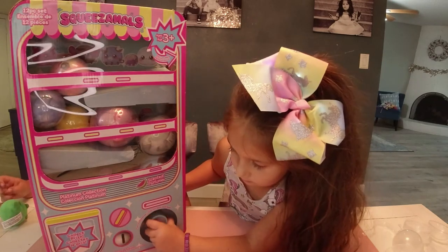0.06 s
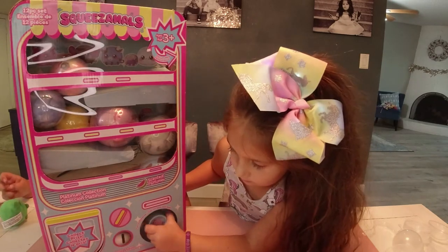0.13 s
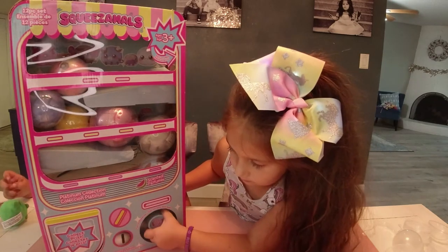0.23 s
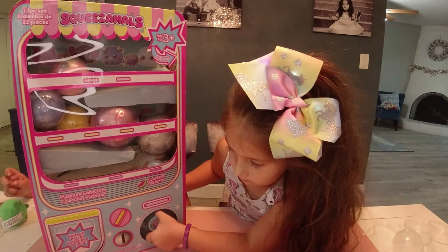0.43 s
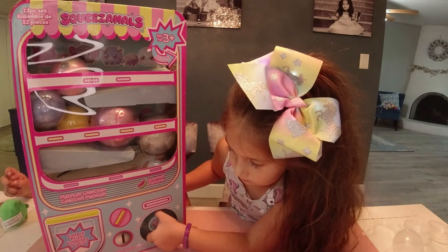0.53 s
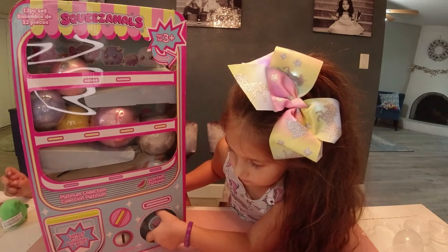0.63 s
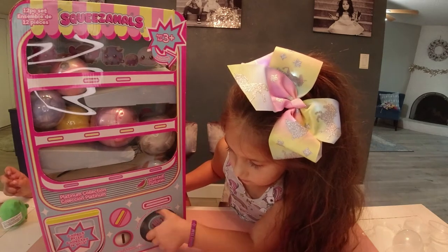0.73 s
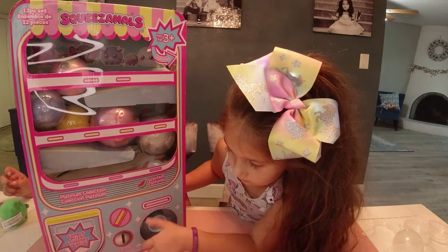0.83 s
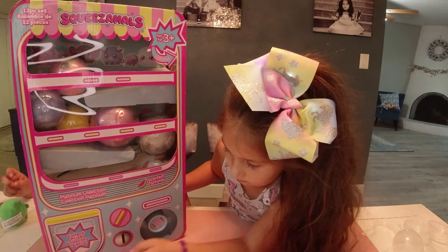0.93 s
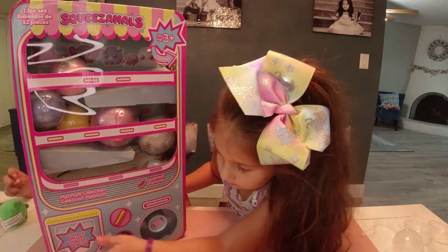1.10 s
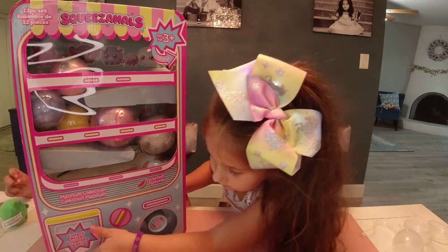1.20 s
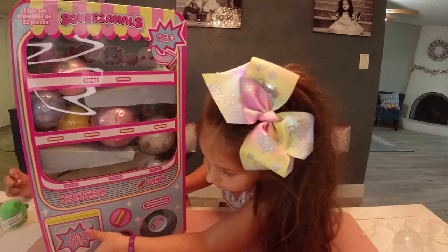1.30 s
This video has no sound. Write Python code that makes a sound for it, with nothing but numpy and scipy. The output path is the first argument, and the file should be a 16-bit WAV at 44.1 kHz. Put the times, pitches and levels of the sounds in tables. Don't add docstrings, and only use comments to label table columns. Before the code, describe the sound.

Plastic capsules clatter in a hollow toy dispenser, heard close in a quiet, softly humming room. Low hand rumble and faint rubbing come first; at 0.25 s the mechanism lets go with a sharp clack. Hard knocks, dull thuds and rolling crowd together until about 0.5 s, weakening by 0.6. Lighter taps follow at 0.8 to 0.98 s, then near quiet and one small knock at 1.23 s with a faint last touch.

```python
import sys
import numpy as np
from scipy import signal
from scipy.fft import rfft, irfft, next_fast_len
from scipy.io import wavfile

SR = 44100
rng = np.random.default_rng(int(sys.argv[2]) if len(sys.argv) > 2 else 0)


def attenuation_scalar(level_db):
    decades = np.asarray(level_db, float) / 20
    return 10 ** decades


def digitize_waveform(pressure):
    field = np.atleast_2d(pressure).T
    bounded = np.clip(field, -1, 1)
    quanta = np.round(bounded * 32767).astype(np.int16)
    wavfile.write(sys.argv[1], SR, quanta)


N = 59535
OPPOSITE = np.array([[1], [-1]])

# start_s, level_db
HANDLING = [
    (0, -65),
    (0.171, -58),
    (.7, -62),
    (.95, -61.5),
    (1.099, -83.5),
    (1.22, -67.5),
    (1.3, -66),
]
HANDLING_HZ, HANDLING_SIDE_DB = (28, 108), -19
# frequency_hz, density_db (per Hz)
FLOOR_SPECTRUM = [(15, -21), (34, -1), (80, -18), (200, -19), (560, -30), (1500, -38), (4500, -44.5),
                  (9000, -59.5)]
FLOOR_DB, FLOOR_SIDE_DB = -69, -7

# start_s, level_db, brightness_db
ROLL_EFFORT = [(0, -73.5, -0.5), (.07, -66.5, -5.5), (.126, -65, 4.5), (.18, -58, 6), (0.223, -53, 5),
               (.29, -64, 8), (0.331, -41.5, -4.5), (.41, -39.5, -4), (.47, -43, -9.5), (.57, -55, -4.5),
               (0.649, -58.5, -12.5), (0.773, -72.5, -14), (.80, -57.5, -4.5), (.86, -58.5, -2.5),
               (.878, -63.5, -4), (.92, -63.5, -6), (1.05, -92.5, 0.5), (1.35, -73, -5.5)]
# frequency_hz, density_db (per Hz)
RUB_SPECTRUM = [(60, -1.5), (180, -4), (450, -7), (1000, -8.5), (1900, -17), (3100, -19.5), (4800, -32.5),
                (7000, -44)]
# pitch_hz, level_db, t60_s
CABINET_MODES = [(134.5, -4.5, 0.096), (213, -10, 0.18), (322.2, 0, 0.15), (400, -5.5, 0.12),
                 (460, -5.5, 0.056), (510.8, -3, .14), (590, -8, 0.2), (749.4, 1, 0.046),
                 (946, -4.5, 0.073), (1046.4, -7, 0.12), (1190, -10.5, 0.011), (1329, -2, 0.033),
                 (1780, 2, 0.014), (2280, -11, 0.02)]
MODE_SPREAD_DB = 4.5
GRAINS_PER_S, GRAIN_SPREAD_DB, ROLL_DB, ROLL_BODY_DB = 1000, 1.5, 5, -7

# start_s, peak_db, pitch_hz, ring_share_db
TICKS = [(0.148, -55, 3250, 4), (.155, -58, 3270, 9.5), (.241, -40.5, 2500, -9), (0.2487, -34, 3155, -3),
         (.250, -48, 4700, 2.5), (0.3053, -33.5, 2720, -11), (0.339, -36.5, 2706, 2.5),
         (.361, -67, 3540, -7.5), (.385, -43.5, 4740, -1.5), (0.407, -39, 1826, 4.5),
         (.434, -28, 2958, -11), (0.489, -50.5, 2410, -0.5), (0.554, -43, 3010, -10.5),
         (0.79, -49.5, 1830, -6), (.810, -66.5, 3020, 1.5), (0.844, -61.5, 2950, -4), (0.863, -63, 2860, 3),
         (0.808, -59, 1900, 4.5), (.822, -75.5, 4270, 0), (0.856, -56.5, 1900, -2.5),
         (.890, -52.5, 2900, -10), (.896, -60, 4700, -3.5), (.904, -66, 4000, 5.5), (.904, -65, 4710, 1),
         (.904, -49.5, 2950, -3), (.975, -60.5, 2280, -9.5), (1.2311, -51, 1800, -4),
         (1.2315, -57, 2600, -1), (1.2315, -64, 3160, 7), (1.231, -69.5, 4700, 5.5), (1.296, -67, 2100, 3)]
TICK_T60_S, TICK_CHATTER_S = 0.013, 0.0012
# frequency_hz, density_db (per Hz)
CRACK_SPECTRUM = [(500, -3), (2000, 0.5), (3200, -11), (4800, -17), (5400, -31), (7000, -42), (9000, -53)]
# level_db, t60_s
CRACK_FADES = [
    (-16.5, .012),
    (-7.5, 0.11),
]
SCATTER_DB, SCATTER_HZ = -2.5, 2500

# start_s, peak_db, pitch_hz, ring_t60_s, boom_db
THUDS = [(.186, -38, 184, 0.045, -48.5), (0.253, -20, 118, 0.063, -33), (0.274, -24, 187, 0.033, -46),
         (0.309, -22, 212.6, 0.15, -36), (0.334, -45.5, 200, 0.082, -40), (.370, -24, 235, 0.049, -40),
         (.395, -25, 304.5, 0.071, -57), (0.4191, -14, 136.8, 0.08, -32), (0.444, -24, 139.5, 0.22, -45.5),
         (0.471, -27, 124.3, 0.1, -50), (.524, -38.5, 145, 0.39, -48), (.561, -36, 144.5, 0.26, -39.5),
         (0.593, -37.5, 134, 0.11, -52.5), (0.617, -39.5, 140, 0.064, -58.5),
         (0.805, -37, 148, 0.069, -62.5), (.857, -42, 125, 0.084, -58.5), (.900, -44, 136.8, 0.15, -54),
         (1.233, -39.5, 207, 0.14, -73.5), (1.262, -49.5, 158, 0.12, -74.5),
         (1.290, -59.5, 173, 0.11, -90.5)]
BOOM_HZ, BOOM_T60_S = 64, 0.23

# start_s, level_db, top_share_db
BUZZES = [
    (0.233, -77, -22.5),
    (0.2505, -64, 3),
    (0.305, -60.5, -5),
    (.339, -78.5, 2.5),
    (.386, -65, -22),
    (0.436, -64, -25),
    (0.486, -101, -15.5),
]
# frequency_hz, density_db (per Hz)
BUZZ_SPECTRUM = [(4500, -31.5), (6000, -5.5), (7400, -12.5), (8600, 0), (10000, -5), (11500, -14),
                 (13400, -18), (14800, -43)]
BUZZ_SNAP_DB, BUZZ_SNAP_T60_S, BUZZ_T60_S = 3.5, 0.02, 0.21
BUZZ_SIDE_DB, BUZZ_TOP_SIDE_DB = 0.5, 5
BUZZ_LOW_STOP_HZ, BUZZ_HIGH_STOP_HZ, BUZZ_RISE = 11300, 8600, 0.01

# start_s, peak_db, shell_pitch_hz, upper_shell_pitch_hz, cabinet_share_db
KNOCKS = [(.241, -32.5, 440, 953, -12.5), (0.2487, -10.5, 1190, 1673, -7), (.257, -26, 442, 1060, -37.5),
          (0.277, -38.5, 308, 920, 5), (0.3057, -11.5, 727, 400, -5), (.316, -22.5, 550, 900, -19),
          (.338, -21.5, 937, 1410, 0), (.361, -27, 460, 940, -5), (.386, -15.5, 400, 747, -11),
          (0.4344, -11.5, 740, 1358, -16.5), (0.45, -25, 550, 1217, -11), (0.4892, -23, 641, 329, -16.5),
          (.554, -33, 400, 1210, -3), (.562, -32.5, 717, 1210, 2.5), (0.752, -51.5, 1250, 1720, -15),
          (0.782, -57, 400, 700, 8), (.791, -31, 690, 1332, -7), (.809, -37, 590, 1010, -23.5),
          (0.885, -41, 400, 1080, -5), (.900, -29, 616, 1316, -9.5), (0.9749, -40, 568, 1328, -12.5),
          (1.2315, -36.5, 564, 787, -1), (1.2358, -41.5, 590, 1120, -17), (1.293, -54.5, 560, 1120, -2)]
SHELL_T60_S, UPPER_DB, UPPER_T60_S = 0.014, -3.5, 0.022
CONTACT_S, CHATTER_S, SHELL_LOW_HZ = 0.00044, 0.0029, 110

# start_s, peak_db, pitch_hz, t60_s
RINGS = [(.251, -21.5, 400, 0.04), (0.2539, -29, 1220, 0.034), (.256, -20, 920, 0.029),
         (.263, -36, 324, 0.044), (0.272, -27, 1190, 0.063), (0.271, -35.5, 1570, 0.045),
         (.314, -25, 315, .04), (.322, -32, 755, 0.066), (.333, -20, 528, 0.082), (.339, -28, 1330, .03),
         (.344, -25, 929, 0.092), (.361, -28, 968, 0.061), (.376, -22.5, 464, .04),
         (.3865, -12.5, 400, 0.032), (.399, -19, 329, 0.043), (.404, -36, 550, 0.068),
         (.441, -24.5, 349, .06), (.438, -22, 775, 0.034), (0.451, -42.5, 1175, 0.035),
         (.461, -27, 590, .05), (.500, -31.5, 760, 0.057), (.562, -34.5, 760, 0.032),
         (.570, -32, 312, 0.064), (.572, -34.5, 590, 0.086), (.608, -43, 328, 0.091),
         (0.796, -41, 1330, .04), (.818, -39, 616, .05), (.822, -65.5, 4270, 0.1),
         (.858, -49.5, 1850, 0.041), (.908, -44, 590, 0.095), (0.909, -47.5, 1300, 0.036),
         (.926, -43, 590, .06), (0.931, -54, 336, 0.2), (.977, -52, 603, 0.074), (0.983, -50, 1337, 0.035),
         (0.991, -52.5, 305, 0.22), (1.025, -57, 567, 0.18), (1.232, -39.5, 575, 0.051),
         (1.231, -42.5, 1072, .11), (1.232, -49.5, 1097, .15), (1.233, -42.5, 1806, .04),
         (1.246, -41.5, 590, .06), (1.259, -39.5, 557, 0.11), (1.302, -50.5, 577, 0.092)]
RING_DB, RING_DAMPING, RING_CHATTER_S = -7.5, 0.61, 0.0011

ROOM_T60_S, WALL_CUT_HZ, ROOM_DB, ROOM_SIDE_DB = 0.3, 2230, -18, -5
PORT_LAG_S, PORT_ECHO_S, PORT_ECHO_DB, PORT_ECHO_HZ = 0.00003, 0.0011, -3.5, 5050
SWAY_DB, SWAY_HZ = -16.5, 65
MIC_LOW_HZ, MIC_TOP_HZ = 50, 5340


def rms_one(x):
    return x / np.sqrt(np.mean(x ** 2) + 1e-20)


def butterworth(x, order, hz, kind="low"):
    return signal.sosfilt(signal.butter(order, hz, kind, fs=SR, output="sos"), x)


def train(s, gains):
    out = np.zeros(N)
    places = np.clip((np.asarray(s) * SR).astype(int), 0, N - 1)
    np.add.at(out, places, gains)
    return out


def ring(clicks, hz, t60):
    r = attenuation_scalar(-60 / (t60 * SR))
    w = 2 * np.pi * hz / SR
    return signal.lfilter([0, np.sin(w)], [1, -2 * r * np.cos(w), r * r], clicks + 1e-18)


def swell(clicks, hz, t60, chatter_s):
    chatter = ring(clicks, hz, chatter_s * 3)
    return ring(chatter, hz, t60) * 8 / (chatter_s * SR)


def fading(s, db, t60):
    return signal.lfilter([1], [1, -attenuation_scalar(-60 / (t60 * SR))], train(s, attenuation_scalar(db)))


def colour(x, spectrum):
    hz = np.maximum(np.arange(N // 2 + 1) * SR / N, 1)
    f, db = np.transpose(spectrum)
    gain = attenuation_scalar(np.interp(np.log(hz), np.log(f), db))
    return rms_one(irfft(rfft(x) * gain, N))


def struck(s, db, modes):
    luck = rng.standard_normal((len(s), len(modes), 2))
    out = 0
    for k, (hz, level_db, t60) in enumerate(modes):
        gains = attenuation_scalar(db + level_db + MODE_SPREAD_DB * luck[:, k, 0]) * np.sign(luck[:, k, 1])
        out = out + ring(train(s, gains), hz, t60)
    return out


def handling():
    s, db = np.transpose(HANDLING)
    noise = butterworth(rng.standard_normal((2, N + SR)), 2, HANDLING_HZ, "band")
    mid, side = rms_one(noise)[:, SR:]
    effort = attenuation_scalar(np.interp(np.arange(N) / SR, s, db))
    return effort * (mid + attenuation_scalar(HANDLING_SIDE_DB) * side * OPPOSITE)


def floor():
    mid, side = (colour(w, FLOOR_SPECTRUM) for w in rng.standard_normal((2, N)))
    return attenuation_scalar(FLOOR_DB) * (mid + attenuation_scalar(FLOOR_SIDE_DB) * side * OPPOSITE)


def rolling():
    s, db, bright_db = np.transpose(ROLL_EFFORT)
    t = np.arange(N) / SR
    sizes = attenuation_scalar(GRAIN_SPREAD_DB * np.minimum(rng.exponential(1, N), 5)) * rng.choice([-1, 1], N)
    happens = rng.random(N) < GRAINS_PER_S / SR
    grains = sizes * happens + 0.11 * rng.standard_normal(N)
    dealt = rng.integers(0, 3, N)
    body = 0
    for k, (hz, level_db, t60) in enumerate(CABINET_MODES):
        body = body + attenuation_scalar(level_db) * ring(grains * (dealt == k % 3), hz, t60)
    direct = attenuation_scalar(np.interp(t, s, bright_db)) * colour(grains, RUB_SPECTRUM)
    return attenuation_scalar(np.interp(t, s, db) + ROLL_DB) * (direct + attenuation_scalar(ROLL_BODY_DB) * rms_one(body))


def ticks():
    s, db, _, _ = np.transpose(TICKS)
    high_rings = sum(swell(train([t], attenuation_scalar(d + share)), f, TICK_T60_S, TICK_CHATTER_S)
                     for t, d, f, share in TICKS)
    fade = sum(fading(s, db + level_db, t60) for level_db, t60 in CRACK_FADES)
    mid, side = (fade * colour(w, CRACK_SPECTRUM) for w in rng.standard_normal((2, N)))
    scattered = attenuation_scalar(SCATTER_DB) * butterworth(side, 1, SCATTER_HZ, "high")
    return high_rings + mid, scattered * OPPOSITE


def thuds():
    s, _, _, _, boom_db = np.transpose(THUDS)
    panel = sum(ring(train([t], attenuation_scalar(d)), f, t60) for t, d, f, t60, _ in THUDS)
    boom = ring(train(s, attenuation_scalar(boom_db)), BOOM_HZ, BOOM_T60_S)
    return butterworth(panel + boom, 2, 500)


def buzz():
    s, db, top_db = np.transpose(BUZZES)
    mid, side = (colour(w, BUZZ_SPECTRUM) for w in rng.standard_normal((2, N)))
    bands = [("low", BUZZ_LOW_STOP_HZ, db, BUZZ_T60_S, BUZZ_SIDE_DB),
             ("high", BUZZ_HIGH_STOP_HZ, db + top_db, BUZZ_T60_S * 0.9, BUZZ_TOP_SIDE_DB)]
    out = 0
    for kind, stop_hz, level_db, t60, side_db in bands:
        snap = fading(s, level_db + BUZZ_SNAP_DB, BUZZ_SNAP_T60_S)
        fade = signal.lfilter([BUZZ_RISE], [1, BUZZ_RISE - 1], fading(s, level_db, t60) + snap)
        both = (mid + attenuation_scalar(side_db) * side * OPPOSITE) * fade
        split = signal.cheby2(10, 50, stop_hz, kind, fs=SR, output="sos")
        out = out + signal.sosfilt(split, both)
    return out


def knocks():
    s, db, _, _, box_db = np.transpose(KNOCKS)
    shell = 0
    for start, d, hz, upper_hz, _ in KNOCKS:
        lower = swell(train([start], attenuation_scalar(d - 1.5)), hz, SHELL_T60_S, CHATTER_S)
        upper = swell(train([start], attenuation_scalar(d - 3.5 + UPPER_DB)), upper_hz, UPPER_T60_S, CHATTER_S)
        shell = shell + lower - upper
    cabinet = struck(s, db + box_db - 9.5, CABINET_MODES)
    t = np.arange(200) / SR / CONTACT_S
    contact = t * np.exp(-4 * t)
    body = signal.lfilter(contact / contact.sum(), [1], shell + cabinet)
    return butterworth(body, 2, SHELL_LOW_HZ, "high")


def rings():
    return sum(swell(train([t], attenuation_scalar(d + RING_DB)), f, t60 * RING_DAMPING, RING_CHATTER_S)
               for t, d, f, t60 in RINGS)


def room(x):
    size = next_fast_len(N + SR)
    turn = -2j * np.pi * np.arange(size // 2 + 1) / size
    z = np.exp(turn)
    dull = np.exp(-2 * np.pi * WALL_CUT_HZ / SR)
    wet = np.zeros((2, len(z)), complex)
    lags = (rng.uniform(0.008, 0.045, 28) * SR).astype(int)
    for k, lag in enumerate(lags):
        loss = attenuation_scalar(-60 * lag / SR / ROOM_T60_S)
        loop = loss * (1 - dull) / (1 - dull * z) * np.exp(lag * turn)
        wet[k % 2] += loop / (1 - loop) * (-1) ** (k // 2)
    mid = wet[0]
    side = wet[1] * (1 - z ** 6) * attenuation_scalar(ROOM_SIDE_DB)
    return irfft(rfft(x, size) * np.array([mid + side, mid - side]), size)[:, :N]


def ports(x):
    n = np.arange(N)
    delayed = np.interp(n - PORT_ECHO_S * SR, n, x)
    echo = attenuation_scalar(PORT_ECHO_DB) * butterworth(delayed, 1, PORT_ECHO_HZ, "high")
    sway = attenuation_scalar(SWAY_DB) * butterworth(x, 2, SWAY_HZ)
    lagging = np.interp(n - PORT_LAG_S * SR, n, x)
    return np.array([x + echo + sway, lagging - echo - sway])


def scene():
    hard, scattered = ticks()
    toy = rolling() + hard + thuds() + knocks() + rings()
    heard = ports(toy) + scattered + attenuation_scalar(ROOM_DB) * room(toy)
    near = butterworth(heard, 4, [MIC_LOW_HZ, MIC_TOP_HZ], "band")
    return handling() + floor() + near + buzz()


def band_limit(x):
    return signal.sosfilt(signal.butter(12, 14900, fs=SR, output="sos"), x)


def record(dry):
    return band_limit(dry)


dry = scene()
out = record(dry)
digitize_waveform(out)
```